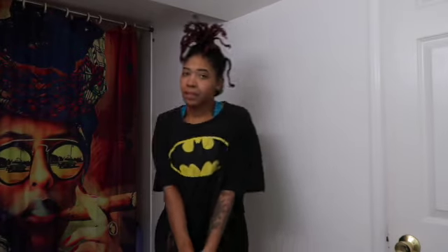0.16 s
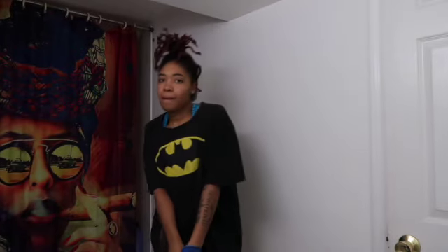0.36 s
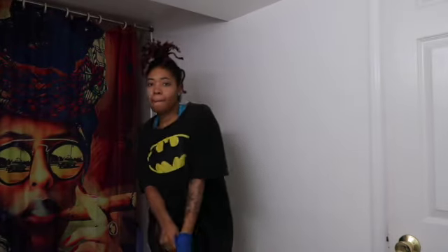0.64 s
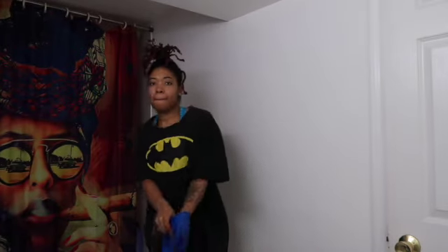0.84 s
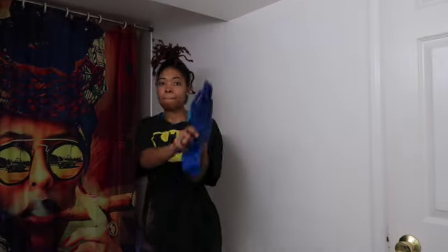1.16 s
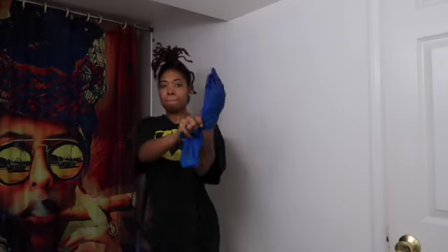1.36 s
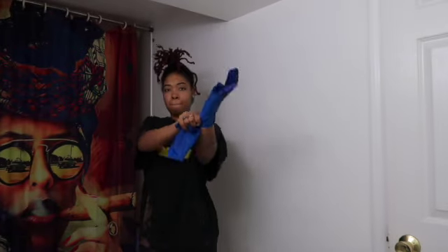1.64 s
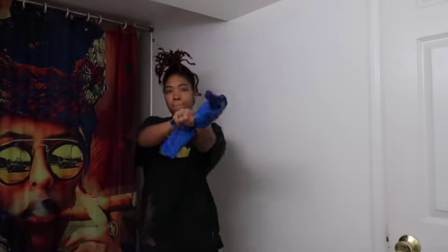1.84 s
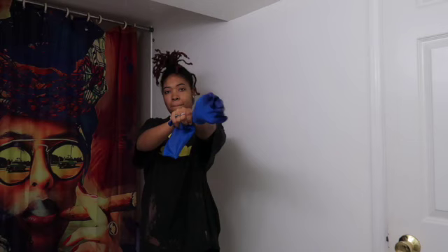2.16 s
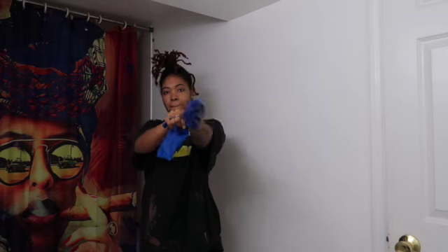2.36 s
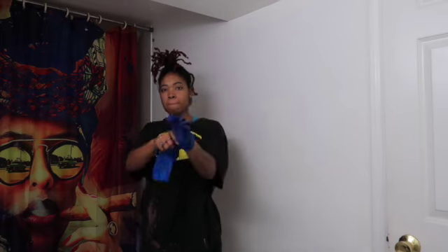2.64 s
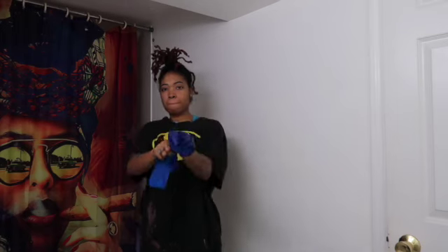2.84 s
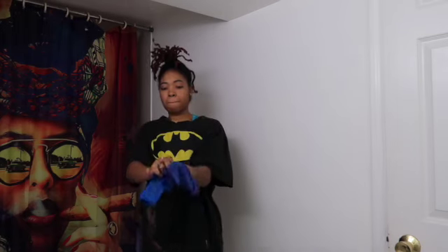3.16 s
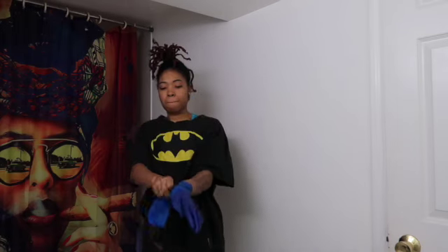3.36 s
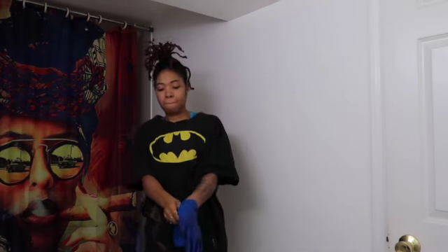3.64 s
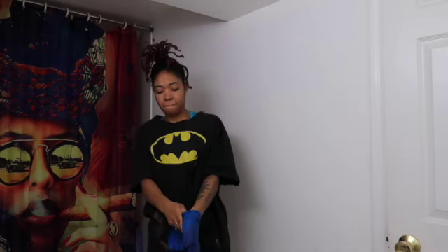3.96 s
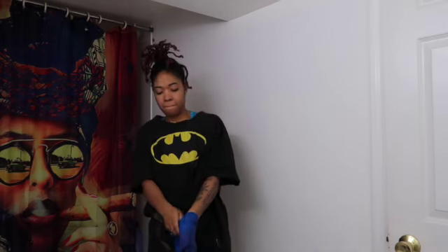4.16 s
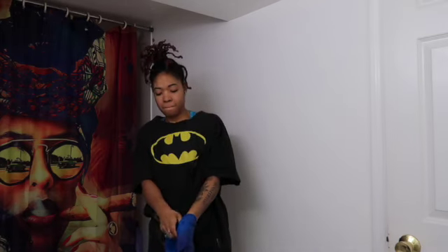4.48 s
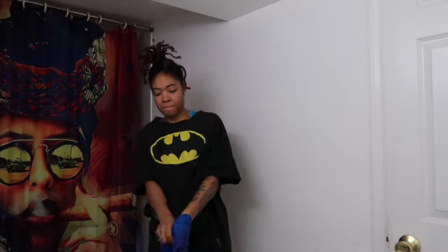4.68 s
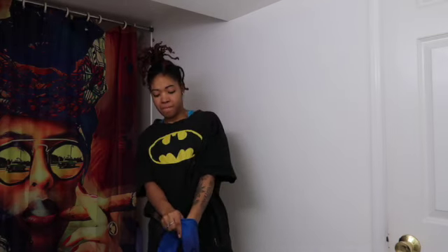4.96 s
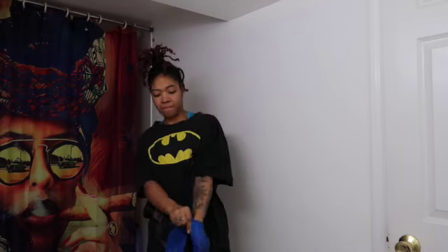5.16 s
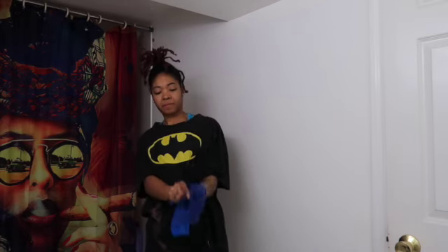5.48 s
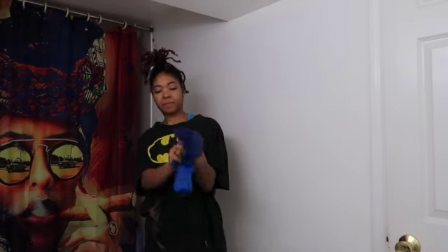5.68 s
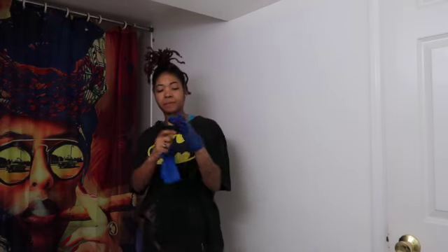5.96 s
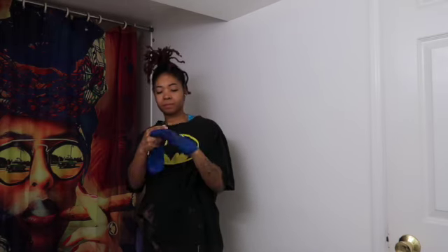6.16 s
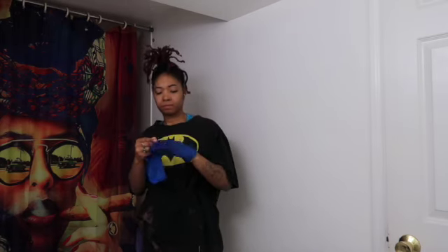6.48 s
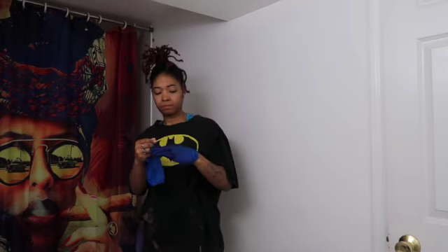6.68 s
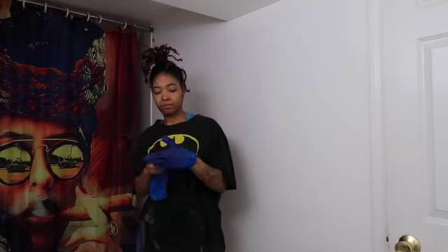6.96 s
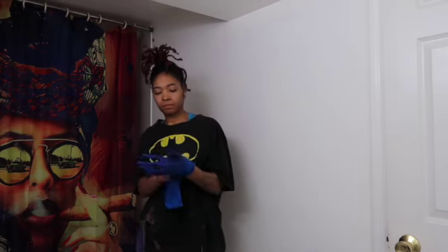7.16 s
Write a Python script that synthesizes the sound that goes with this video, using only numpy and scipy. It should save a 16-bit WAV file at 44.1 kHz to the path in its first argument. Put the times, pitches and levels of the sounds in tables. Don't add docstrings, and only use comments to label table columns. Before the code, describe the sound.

A thin rubber glove is pulled on a few metres from a small camera in a hard-walled bathroom. Soft rustling and dragging lead to one piercing snap near two seconds, briefly followed by a smaller one. Quieter ticks and drags continue, a cluster of snaps follows around five seconds, then two strong rubbery pops near the end. Low house rumble and a passing engine drone lie underneath.

```python
import sys
import numpy as np
from scipy import signal
from scipy.fft import rfft, irfft
from scipy.io import wavfile
from scipy.ndimage import uniform_filter1d

SR = 44100
rng = np.random.default_rng(int(sys.argv[2]) if len(sys.argv) > 2 else 0)


def master(y):
    cut = np.clip(np.atleast_2d(y).T, -1, 1)
    pcm = np.round(cut * 32767)
    wavfile.write(sys.argv[1], SR, pcm.astype(np.int16))


def amplitude_ratio(level_db):
    exponent = np.asarray(level_db, float) / 20
    return 10 ** exponent


N = 322812


def level(x, db=0):
    return x * amplitude_ratio(db) / np.sqrt(np.mean(x ** 2))


def colour(x, table):
    hz, db = np.transpose(table)
    f = np.fft.rfftfreq(x.shape[-1], 1 / SR) + 1
    gain = amplitude_ratio(np.interp(np.log(f), np.log(hz), db))
    return irfft(rfft(x) * gain, x.shape[-1])


def band(x, lo_hz, hi_hz, order=2):
    edges = [lo_hz, min(hi_hz, .45 * SR)]
    return signal.sosfilt(signal.butter(order, edges, "band", fs=SR, output="sos"), x)


def curves(table):
    s, *columns = np.transpose(table)
    return [np.interp(np.arange(N) / SR, s, c) for c in columns]


def walk(rate_hz):
    hold = int(SR / rate_hz)
    steps = np.repeat(rng.standard_normal(N // hold + 1), hold)
    return 1.62 * uniform_filter1d(uniform_filter1d(steps, hold), hold)[:N]


def slips(table, flutter_ms, rise_ms, width=0.62, crack_db=-4, body_db=2, skirt_db=-7,
          creep_db=-30, creep_ms=4, release=4.1):
    size, lead = 8192, 1024
    out = np.zeros(N + 16384)
    ms = (np.arange(size) - lead) * 1000 / SR
    flutter = np.exp(-(ms / max(flutter_ms, .3)) ** 2) * (1 - np.exp(-np.abs(ms) / rise_ms))
    creep = amplitude_ratio(creep_db) * np.exp(-np.abs(ms) / creep_ms)
    shape = np.where(ms > 0, flutter, creep)
    f = np.fft.rfftfreq(size, 1 / SR) + 1
    fold = np.r_[1, 2 * np.ones(size // 2 - 1), 1, np.zeros(size // 2 - 1)]
    noises = rng.standard_normal((len(table), size))
    for (s, db, hz, crack, *body), noise in zip(table, noises):
        push = noise * shape
        push[lead] = release
        humps = [(hz, width, 0),
                 (.75 * hz, .55, skirt_db),
                 (5500, .9, crack + crack_db),
                 (800, .55, sum(body) + body_db)]
        gain = sum(amplitude_ratio(d) * np.exp(-(np.log(f / c) / w) ** 2) for c, w, d in humps) + 1e-4
        ringing = np.exp(rfft(fold * irfft(np.log(gain))))
        slip = irfft(rfft(push) * ringing)
        at = int(s * SR)
        out[at:at + size] += amplitude_ratio(db) * slip / np.abs(slip).max()
    return out[lead:lead + N]


# (time [s], peak level [dB], pocket pitch [Hz], crack [dB], body [dB])
SNAP_HITS = [(0.499, -22.5, 1500, -13, -7), (2.065, 4.5, 2950, 2, -13.5), (2.1005, -6, 2040, -32, -27),
             (3.974, -15, 3300, -1.5, -16), (4.815, -19, 3330, -14.5, -10), (4.984, -23, 2760, -11, -18),
             (5.497, -16, 2040, -4, -30), (5.586, -24, 2550, -1, -22), (5.925, -24.5, 2500, -14, -13),
             (6.389, -12, 2020, -48, -7), (6.6595, -6, 1760, -38, -11)]


def snaps():
    return slips(SNAP_HITS, flutter_ms=0.77, rise_ms=0.15, width=0.28, skirt_db=-9, release=3.6)


# (time [s], peak level [dB], pocket pitch [Hz], crack [dB])
SPRING_BACKS = [
    (2.066, -19, 3200, 10),
    (4.822, -24.5, 1430, -17),
    (4.988, -19, 2700, -36),
    (6.39, -3.5, 2726, -54),
    (6.663, -5.5, 1645, -41.5),
]


def chatter():
    return slips(SPRING_BACKS, flutter_ms=9.9, rise_ms=3.4, width=.13, body_db=-23, skirt_db=-12.5,
                 release=.3)


# (time [s], peak level [dB], pocket pitch [Hz], crack [dB])
SKIN_DRAGS = [(0.028, -38, 1100, -12), (0.503, -23.5, 1010, -29), (0.72, -57, 1800, -17),
              (0.829, -45, 1510, -31), (0.966, -33.5, 1440, 0), (1.058, -24.5, 1620, -4.5),
              (1.354, -35.5, 1670, -13), (1.415, -26, 3630, -17), (1.568, -26.5, 2700, -19),
              (1.648, -32.5, 2800, -23), (2.06, -12, 4500, 12.5), (2.477, -33, 2502, -3),
              (2.802, -38.5, 2488, -10.5), (3.276, -37, 3160, 12), (3.458, -26, 2650, -4),
              (3.819, -35.5, 2520, -13), (3.98, -24, 1820, -16), (4.107, -33.5, 2300, -5),
              (4.281, -51, 750, -23), (4.574, -35.5, 1270, -14), (4.644, -30, 1450, -5),
              (4.83, -30.5, 1390, -40), (5.129, -37, 1570, -8), (5.506, -24, 2140, -7.5),
              (5.544, -23.5, 2670, -9), (5.599, -31, 1970, -10.5), (5.881, -32, 2140, -7),
              (5.924, -21, 2660, -9)]


def drags():
    return slips(SKIN_DRAGS, flutter_ms=26, rise_ms=10, width=0.51, crack_db=6.0, body_db=-7,
                 skirt_db=-8.5, creep_db=-4, creep_ms=3.5, release=.3)


# (time [s], peak level
# [dB], pocket pitch [Hz], crack [dB])
FILM_TICKS = [(0.765, -38.5, 3030, -27), (0.949, -35.5, 1420, -5), (1.061, -29.5, 1510, -1),
              (2.101, -10, 3300, -24.5), (2.406, -41.5, 1870, -6), (2.469, -31.5, 2240, 5),
              (2.763, -37.5, 2560, 0), (3.192, -44, 2360, -2), (3.493, -29, 2940, 4), (3.805, -31, 3860, 5),
              (3.92, -35.5, 3320, 3), (4.639, -30.5, 1450, 2), (5.129, -31.5, 1730, 2.5),
              (5.34, -35, 3010, 2), (5.811, -39.5, 1030, -11), (6.216, -47, 825, -29),
              (6.66, -18, 4330, -35), (7.11, -44, 2230, -18), (7.233, -44.5, 1340, -32)]


def ticks():
    return slips(FILM_TICKS, flutter_ms=3.6, rise_ms=.3, body_db=-2)


# (time [s], level [dB])
RUB_EFFORT = [(0.0, -52), (0.4, -64), (0.53, -51), (0.69, -54.5), (1.59, -51.5), (1.89, -58.5),
              (2.5, -75.5), (2.63, -80), (3.12, -73.5), (3.95, -53), (4.2, -69), (4.54, -58), (4.83, -51),
              (5.8, -62), (6.01, -97), (6.24, -53.5), (6.55, -77.5), (7.32, -60.5)]
# (frequency [Hz], density [dB per Hz])
RUBBER_COLOUR = [(200, -23.5), (500, -7.5), (1000, 2), (2500, 2), (4300, -10), (7000, -18.5), (12000, -39)]


def rub(rate_hz=2500, spread_db=14.5, smooth_db=0, patchy_db=2.5):
    db, = curves(RUB_EFFORT)
    treble_db = -2.5 - 0.54 * (db + 49)
    sizes = amplitude_ratio(np.minimum(spread_db * rng.exponential(size=N), 12))
    grains = (rng.random(N) < rate_hz / SR) * rng.choice([-1, 1], N) * sizes
    hiss = level(rng.standard_normal(N), smooth_db)
    rustle = (level(grains) + hiss) * amplitude_ratio(patchy_db * walk(30))
    treble = level(band(rustle, 1900, 10000))
    return amplitude_ratio(db) * (level(colour(rustle, RUBBER_COLOUR)) + amplitude_ratio(treble_db) * treble)


# (time [s], peak level [dB], pitch [Hz])
HAND_KNOCKS = [(0.506, -40, 355), (2.065, -38.5, 375), (2.467, -63.5, 173.8), (3.461, -54, 127),
               (3.975, -46, 272), (4.641, -54, 254), (4.814, -53, 362), (4.984, -52.5, 362),
               (5.497, -53, 308), (5.924, -50, 350), (6.39, -46.5, 253), (6.66, -41, 243),
               (6.66, -39.5, 374)]


def thumps(t60_s=0.034, rise_ms=0.27):
    out, t = np.zeros(N + 4096), np.arange(4096) / SR
    for s, db, hz in HAND_KNOCKS:
        at = int(s * SR)
        envelope = amplitude_ratio(db - 60 * t / t60_s) * (1 - np.exp(-t * 1000 / rise_ms))
        out[at:at + len(t)] += envelope * np.sin(2 * np.pi * hz * t)
    return out[:N]


# (frequency [Hz], level [dB])
MIC_TONE = [(100, 9.5), (3500, 4.5), (6000, -3), (9500, -8), (11500, -9), (14000, -24.5), (16500, -78.5)]
# (frequency [Hz], level [dB])
PORT_WIDTH = [(60, -26), (200, -38.5), (500, -15), (1300, -11), (2400, -8), (4400, -1.5), (8000, -4.5),
              (12000, 5), (14500, 8), (16500, -22.5)]


def microphones(mid, side):
    return np.array([colour(mid, MIC_TONE), colour(side, PORT_WIDTH)])


# (frequency [Hz], time to fall 60 dB [s])
BATHROOM_T60 = [(125, 0.82), (300, 0.42), (700, 0.39), (1200, 0.36), (1750, 0.32), (2500, 0.29),
                (4000, 0.24), (7000, 0.33), (12000, 0.14)]
# (delay [ms], level [dB])
WALL_ECHOES = [
    (3.5, -7),
    (8.3, -10),
    (11.7, -11),
]


def room(x, tail_db=3.0, build_ms=0.27):
    t = np.arange(SR) / SR
    paths = np.zeros((2, SR))
    table_hz, table_s = np.transpose(BATHROOM_T60)
    for hz in 62.5 * 2 ** np.arange(0, 8.1, .5):
        t60 = np.interp(np.log(hz), np.log(table_hz), table_s)
        noise = rng.standard_normal((2, SR))
        paths += band(noise, hz / 2 ** .25, hz * 2 ** .25) * amplitude_ratio(-60 * t / t60)
    ring_hz, ring_width_hz, ring_t60_s, ring_db = 1718, 193, 0.41, 1.5
    ring = band(rng.standard_normal((2, SR)), ring_hz - ring_width_hz / 2, ring_hz + ring_width_hz / 2)
    paths += ring * amplitude_ratio(ring_db - 60 * t / ring_t60_s)
    paths *= (1 - np.exp(-t * 1000 / build_ms)) * amplitude_ratio(tail_db) / np.sqrt(np.sum(paths[1] ** 2))
    paths[0, 0] = 1
    for k, (ms, db) in enumerate(WALL_ECHOES):
        paths[0, int(ms * SR / 1000)] += (-1) ** k * amplitude_ratio(db)
    mid, side = signal.fftconvolve(x[None], paths, axes=1)[:, :N]
    return microphones(mid, side)


# (time [s], pitch [Hz], level [dB])
ENGINE_LOW = [
    (0.0, 95, -48),
    (1.36, 96.2, -51.5),
    (1.58, 96.2, -44),
    (2.05, 95.7, -46.5),
    (2.25, 97.5, -50.5),
    (3.3, 97.5, -40),
    (3.75, 92.5, -49.5),
    (4.0, 82.8, -41.5),
    (4.3, 83.5, -64),
]
# (time [s], pitch [Hz], level [dB])
ENGINE_UPPER = [
    (3.5, 121.6, -63),
    (3.746, 129, -40),
    (3.93, 123.4, -45),
    (4.05, 129, -67),
]


def drone():
    out, t = 0, np.arange(N) / SR
    for table in (ENGINE_LOW, ENGINE_UPPER):
        hz, db = curves(table)
        start, end = table[0][0], table[-1][0]
        fade = np.clip(np.minimum(t - start + .05, end + .05 - t) / .1, 0, 1)
        tone = np.sin(2 * np.pi * np.cumsum(hz) / SR)
        out = out + np.sqrt(2) * amplitude_ratio(db + 2.9 * walk(21)) * fade * tone
    return out


# (frequency [Hz], density [dB per Hz])
HOUSE_MID = [(12, -28.5), (20, -9), (94, 0.5), (248, -7.5), (434, -6), (496, -14.5), (703, -14),
             (848, -20.5), (1300, -14.5), (1570, -20.5), (3410, -24), (3700, -21), (4700, -31.5),
             (9180, -36.5), (12000, -41.5), (15600, -86.5), (22000, -120)]
# (frequency [Hz], density [dB per Hz])
HOUSE_WIDTH = [(12, -60.5), (20, -38), (197, -5), (332, -8.5), (392, -4), (561, -12.5), (1430, -17.5),
               (2230, -21.5), (3560, -23), (4310, -23), (5680, -32), (12600, -33.5), (14500, -53.5)]


def house(mid_db=-45, side_db=-49):
    noise = rng.standard_normal((2, N))
    mid = colour(noise[0], HOUSE_MID)
    swell = (amplitude_ratio(3.0 * walk(3.6)) - 1) * band(mid, 30, 130)
    flicker = (amplitude_ratio(2.2 * walk(6.9)) - 1) * band(mid, 200, 6200)
    return np.array([level(mid + swell + flicker, mid_db), level(colour(noise[1], HOUSE_WIDTH), side_db)])


def camera(mid_db=-28, side_db=-21, spread_db=5., whine_db=-79, whine_hz=13020):
    steps = np.zeros(N)
    for first_s in (.0372, .0455):
        at = (np.arange(first_s, N / SR, .04) * SR).astype(int)
        steps[at] = amplitude_ratio(np.minimum(spread_db * rng.standard_normal(len(at)), 6))
    whine = amplitude_ratio(whine_db) * np.sin(2 * np.pi * whine_hz * np.arange(N) / SR)
    mid = amplitude_ratio(mid_db) * band(steps, 2230, 4450)
    side = amplitude_ratio(side_db) * band(steps, 3900, 4900) + whine
    return np.array([mid, side])


# (time [s], depth [dB])
GAIN_DIPS = [
    (2.069, 8),
    (6.66, 1.5),
]


def duck(rest_db=-5.5, fall_db_per_s=50, hold_s=0.47, rise_db_per_s=8.5):
    t, db = np.arange(N) / SR, rest_db
    for s, depth_db in GAIN_DIPS:
        fall = fall_db_per_s * (t - s)
        rise = depth_db - rise_db_per_s * (t - s - depth_db / fall_db_per_s - hold_s)
        db = db - np.clip(np.minimum(fall, rise), 0, depth_db)
    return amplitude_ratio(db)


def scene():
    glove = amplitude_ratio(-2.5) * snaps() + amplitude_ratio(-14) * chatter() + amplitude_ratio(-12) * drags() + amplitude_ratio(-1) * ticks()
    glove = glove + amplitude_ratio(-12.5) * rub() + amplitude_ratio(3) * thumps()
    mid, side = room(glove / duck()) + house() + camera()
    mid = mid + drone()
    return np.array([mid + side, mid - side])


def roll_off(x):
    return signal.sosfilt(signal.butter(12, 16830, fs=SR, output="sos"), x)


def record(dry):
    mix = np.clip(dry * duck(), -1, 1)
    return roll_off(mix)


dry = scene()
out = record(dry)
master(out)
```